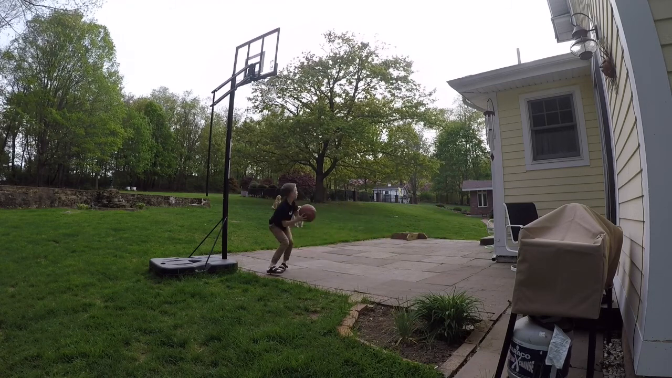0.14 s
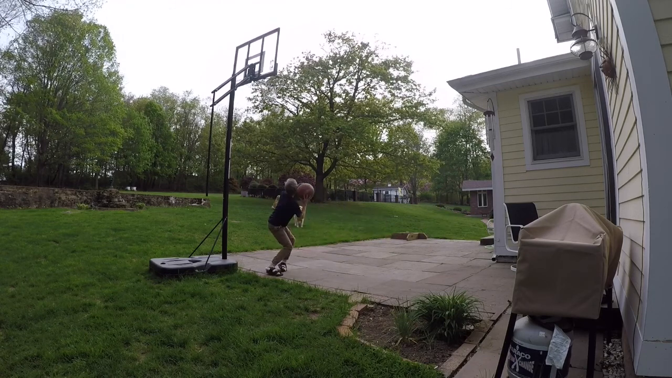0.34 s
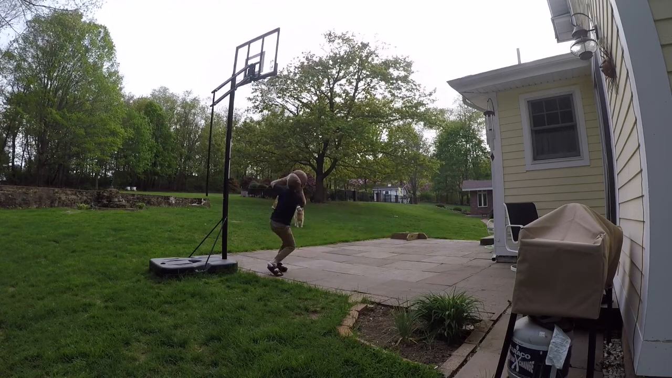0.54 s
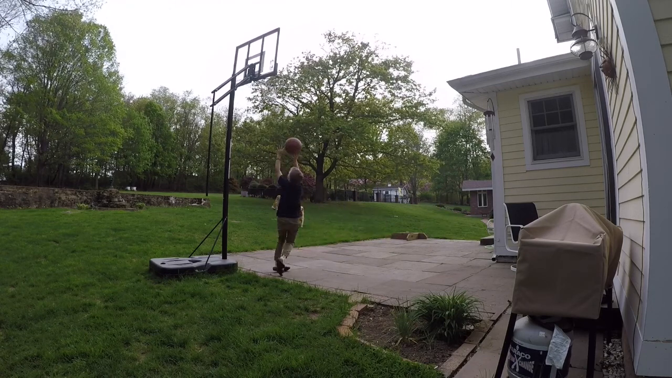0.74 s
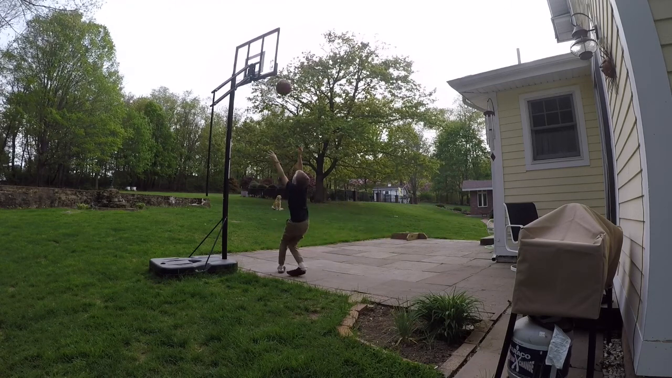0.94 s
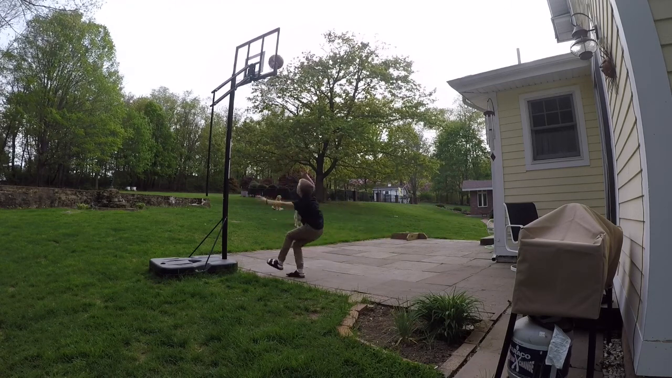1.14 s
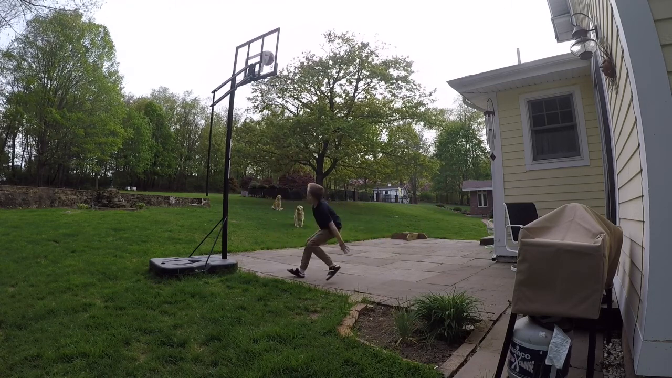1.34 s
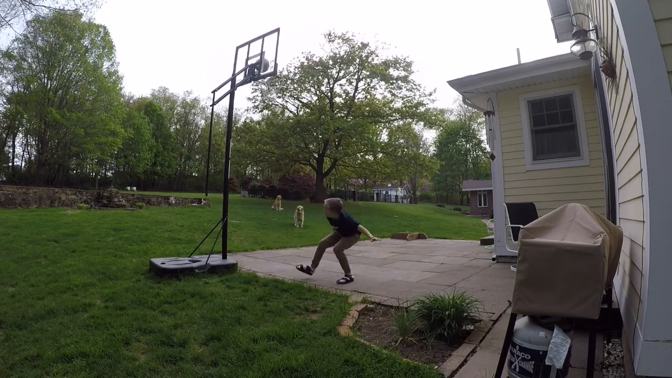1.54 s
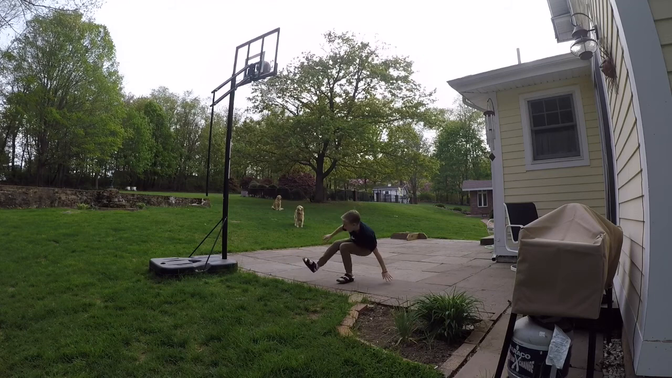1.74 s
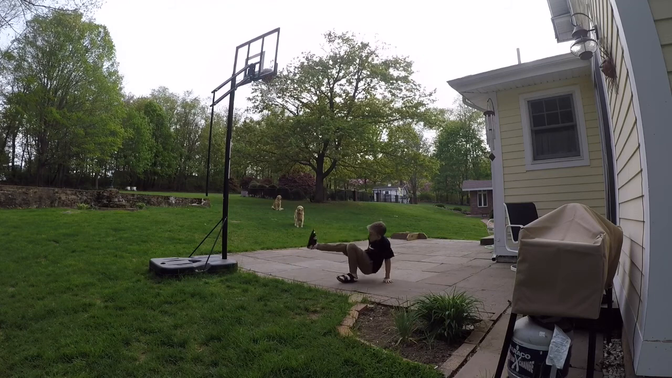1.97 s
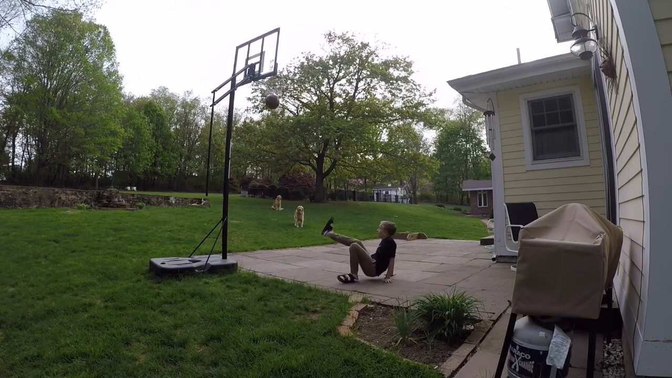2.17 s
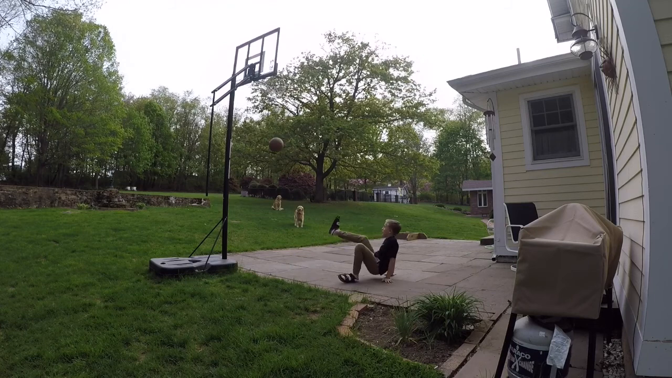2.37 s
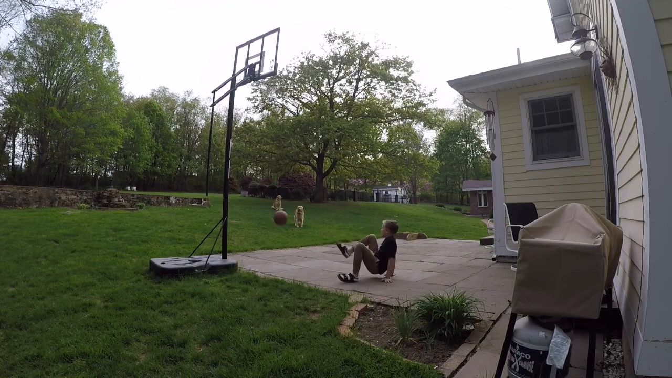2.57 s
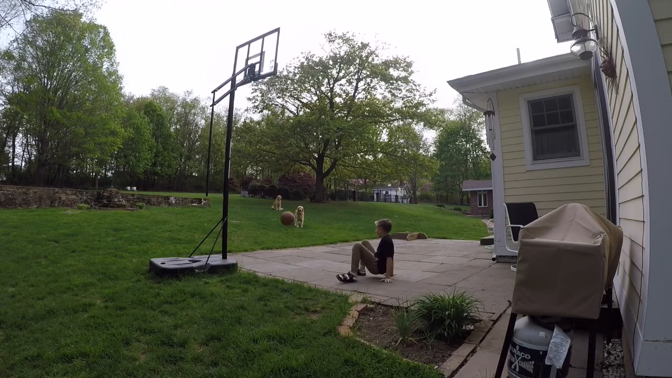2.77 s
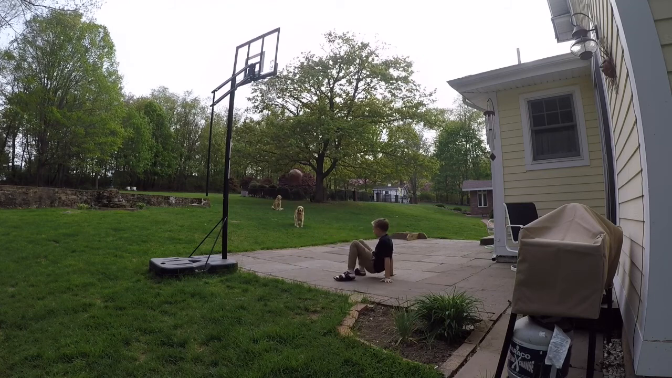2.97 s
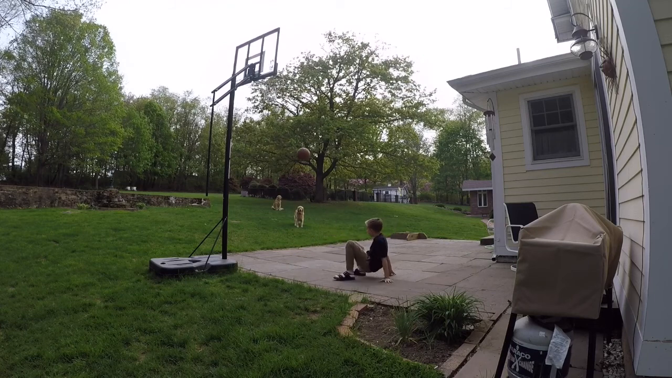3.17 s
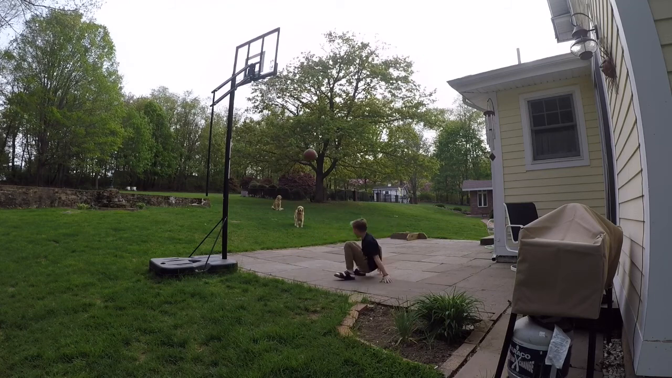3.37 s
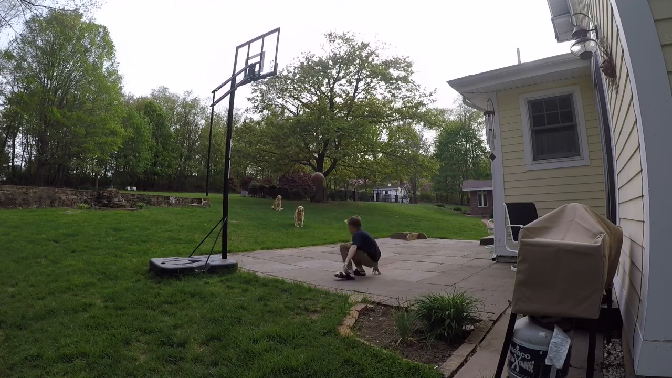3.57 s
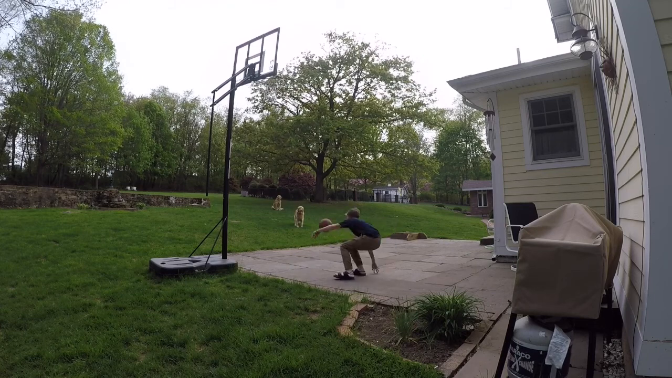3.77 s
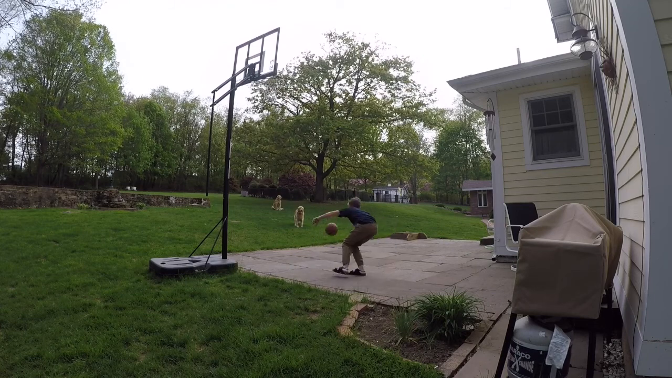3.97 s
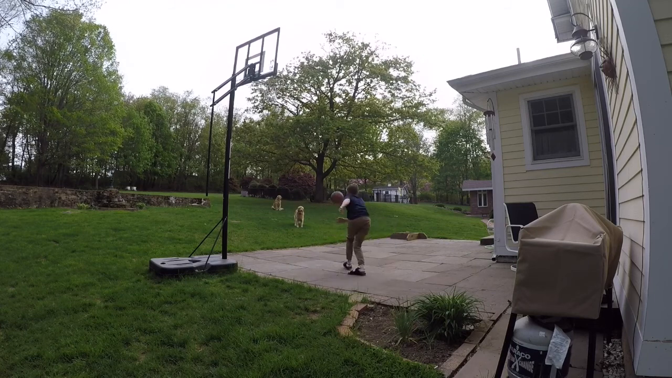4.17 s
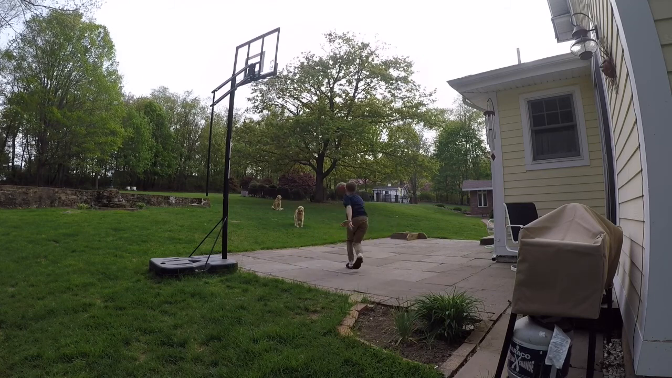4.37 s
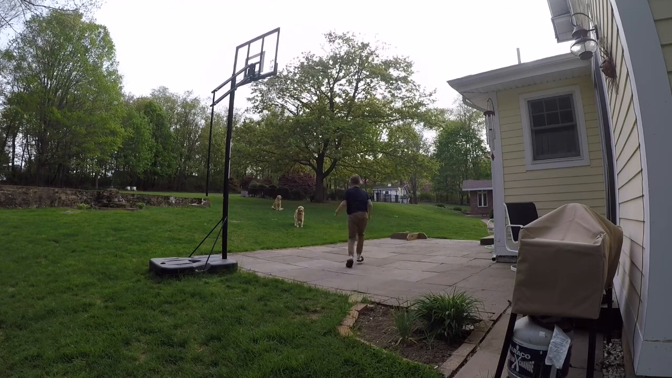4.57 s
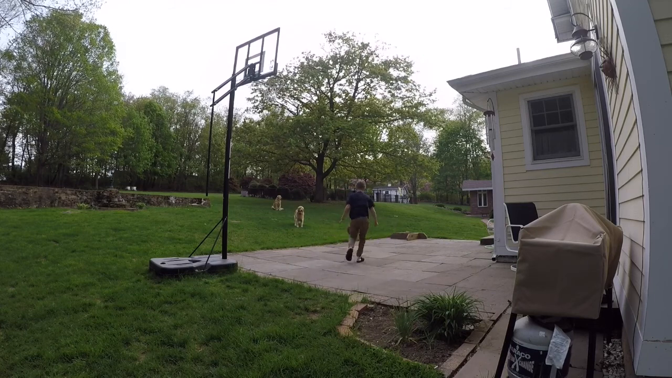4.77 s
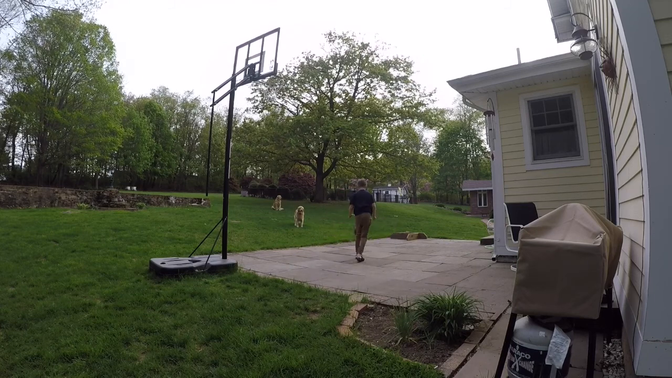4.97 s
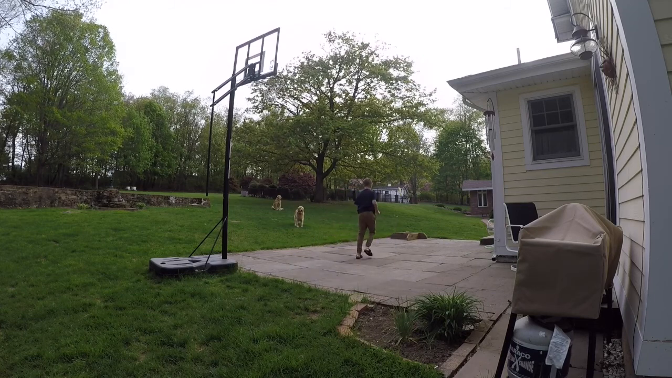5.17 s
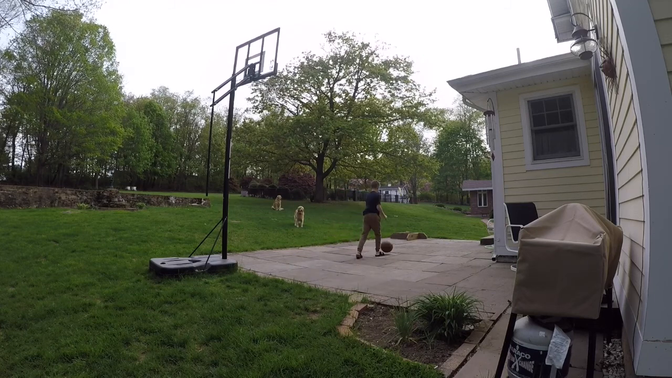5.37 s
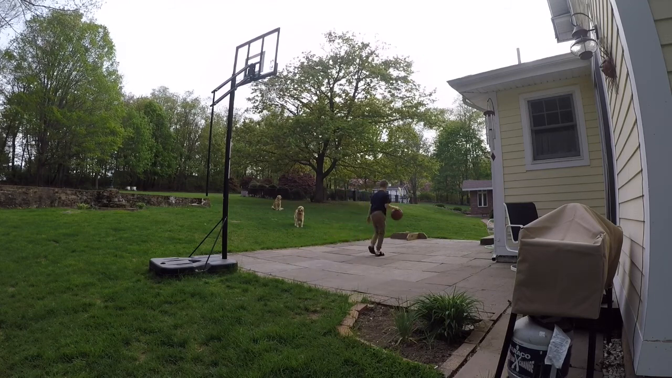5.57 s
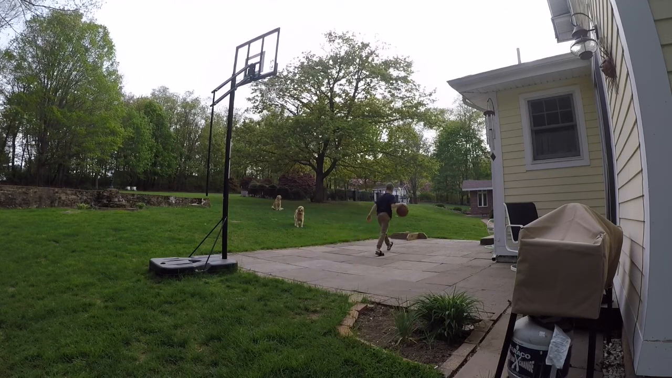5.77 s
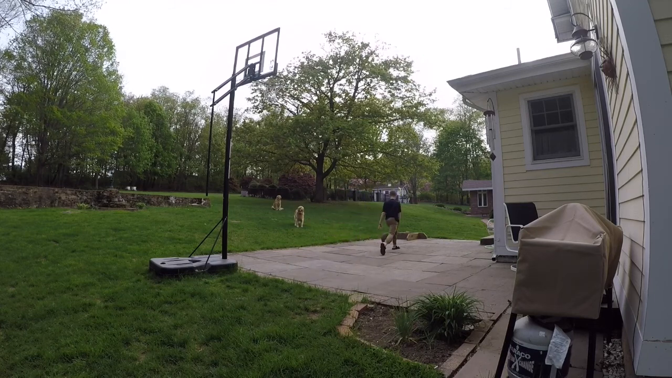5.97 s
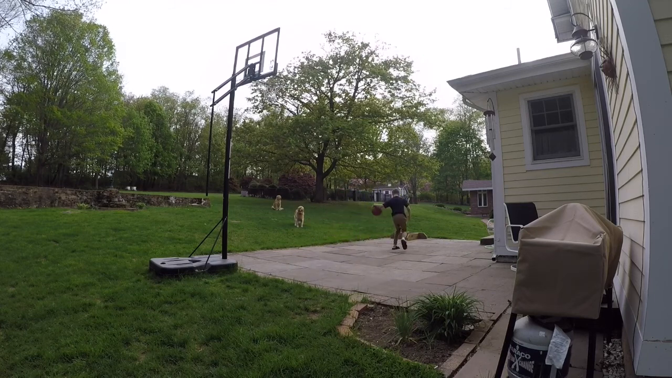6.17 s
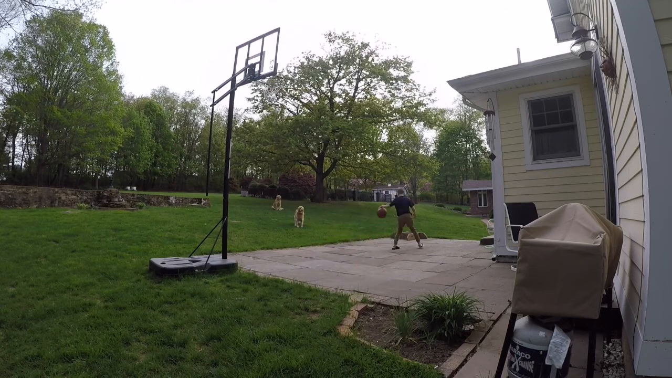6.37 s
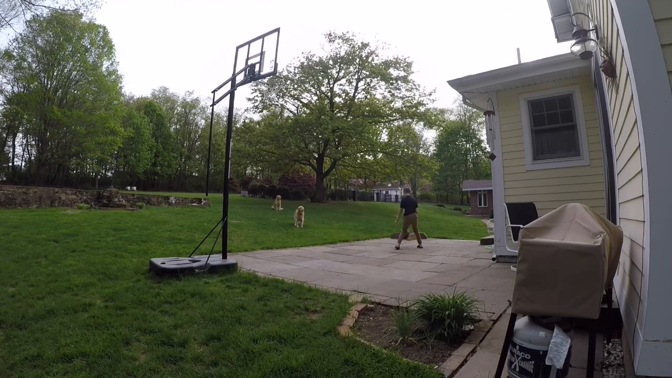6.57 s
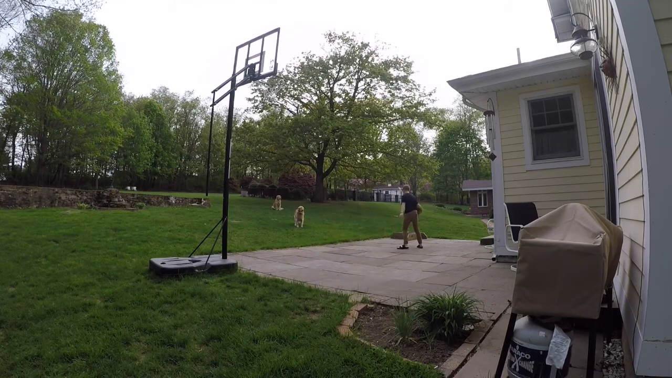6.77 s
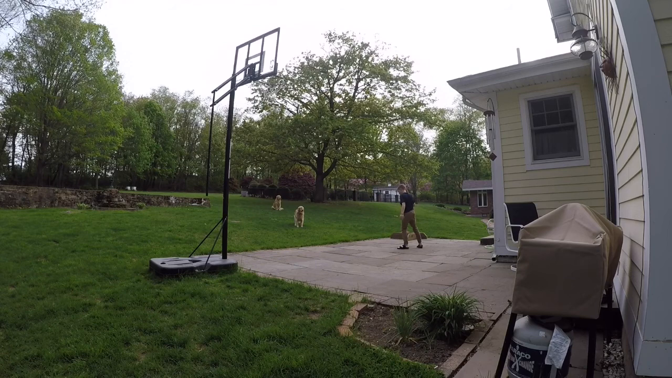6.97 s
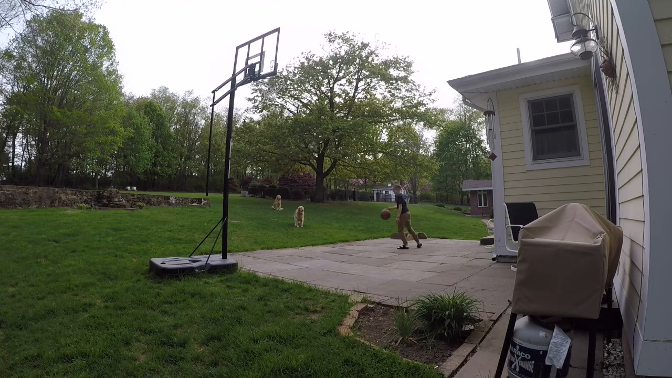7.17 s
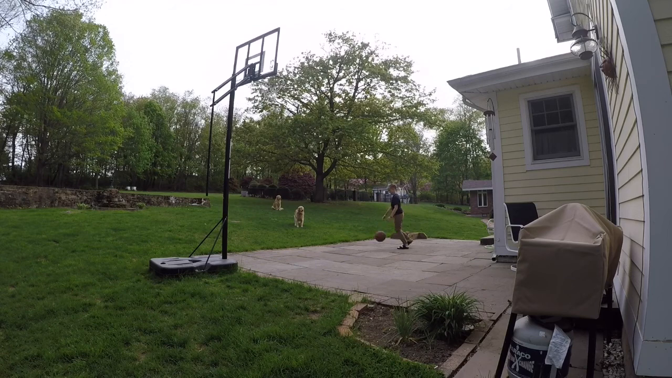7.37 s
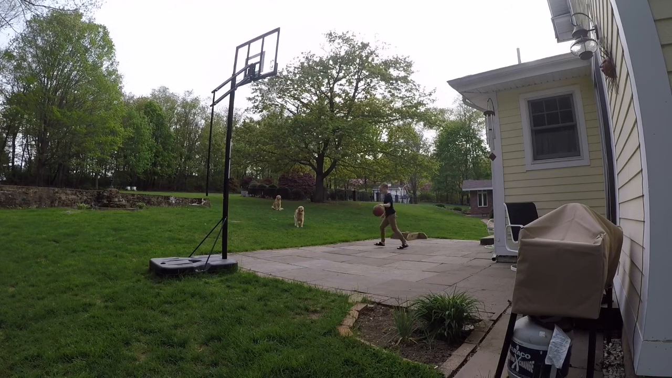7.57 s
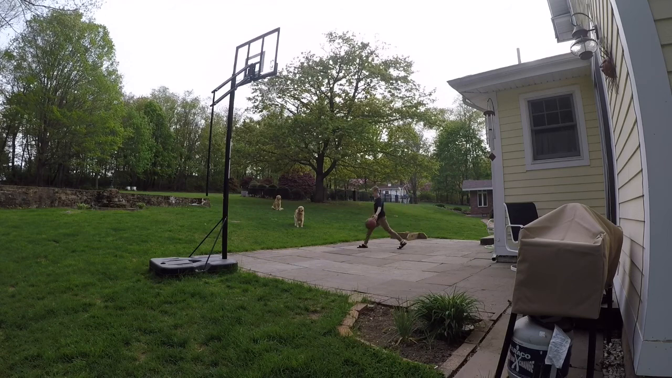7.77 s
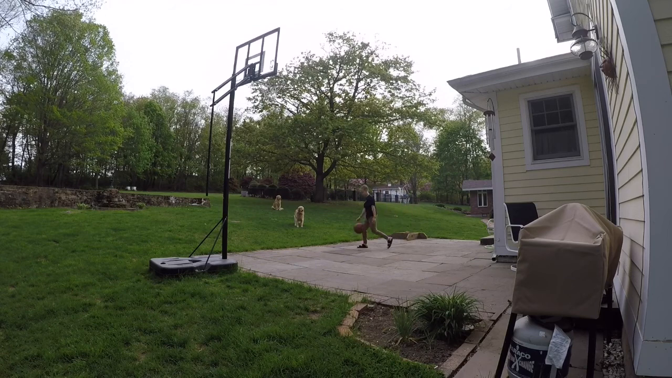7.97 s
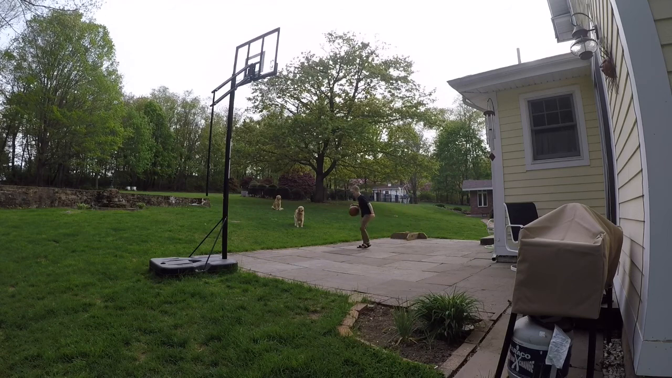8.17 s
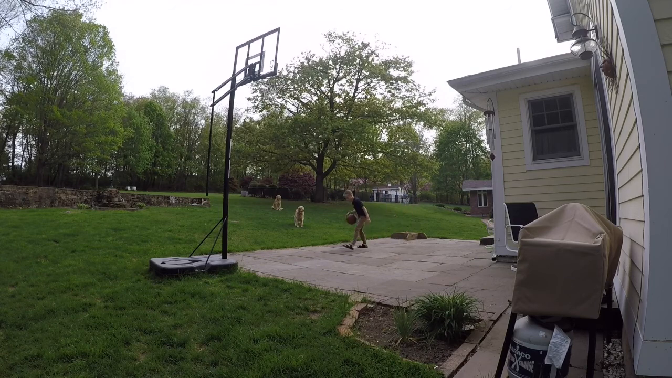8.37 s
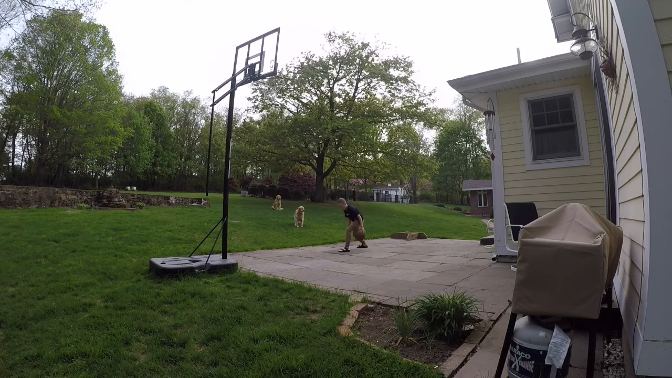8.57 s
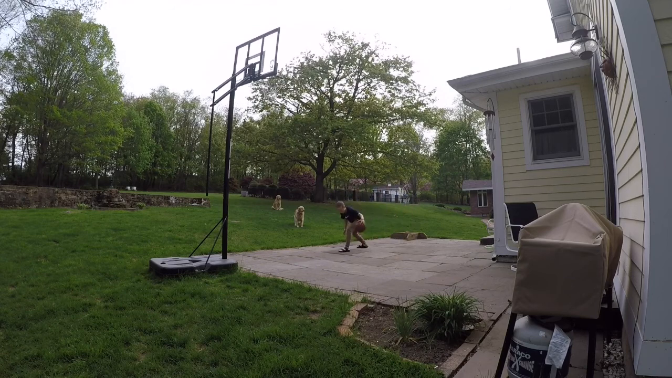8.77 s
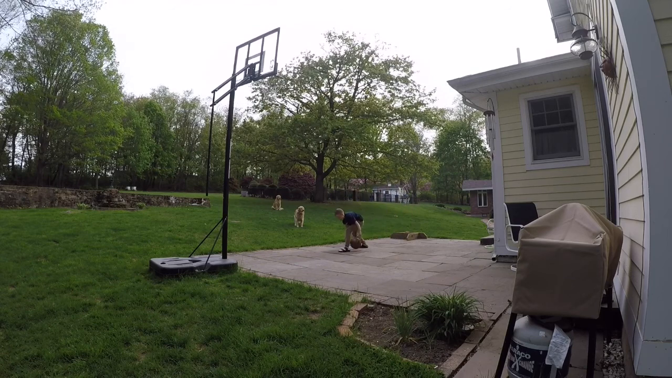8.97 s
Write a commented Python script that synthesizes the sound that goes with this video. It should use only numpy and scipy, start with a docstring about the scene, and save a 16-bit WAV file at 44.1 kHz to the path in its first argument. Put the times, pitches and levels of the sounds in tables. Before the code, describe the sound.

Shoes scuff, a metal hoop rattles, then a basketball is dribbled unevenly on stone over distant hum and a late breeze.

```python
"""Shoes slap and scuff on a stone patio while a distant engine drones over suburban hiss.
At 1.5 s a rubber ball jolts a loose metal hoop, which rattles, and a few short squeaks follow.
From 2.7 s the ball is dribbled between more slaps and scuffs; the house wall and far trees throw
the hits back. From about 7 s a breeze buffets the microphone."""
import sys
import numpy as np
from scipy import signal
from scipy.fft import rfft, irfft
from scipy.io import wavfile

SR = 44100
rng = np.random.default_rng(int(sys.argv[2]) if len(sys.argv) > 2 else 0)


def master_out(mix):
    """Clip the mix to full scale and print it as 16-bit PCM to the path in sys.argv[1]."""
    frames = np.transpose(np.atleast_2d(mix))
    ceiling = np.clip(frames, -1, 1)
    pcm = np.round(ceiling * 32767).astype(np.int16)
    wavfile.write(sys.argv[1], SR, pcm)


N = 397341
TIME = np.arange(N) / SR

# how hard the breeze hits the microphone: (time [s], level [dB])
BREEZE = [(0, -61), (.3, -72), (1.5, -72), (2.7, -76), (2.85, -54), (3.1, -66), (3.7, -69), (4.5, -72),
          (6.1, -76), (6.6, -53.5), (7.0, -52.5), (7.35, -41), (7.6, -39), (8.0, -34.5), (8.35, -41.5),
          (8.7, -34), (9.01, -45.5)]


def ball():
    """A rubber ball thuds on stone, the air inside it pings, and walls and trees send the hit back."""
    # (time [s], thud [dB], thud's tones above its pitch [dB], thud ring time [x], knock [dB], crack [dB], #
    # thud pitch [Hz], knock centre [Hz], knock narrowness [dB/octave^2], crack top [Hz], wall delay [s], # wall
    # echo [dB], far thud [dB], far crack [dB], scatter [dB], late scatter [dB])
    bounces = [(2.718, -5, -2.5, 0.78, -20, -4, 165.7, 1502, 12, 6800, 0.0075, -20, -12.5, -25, -13, -12.5),
               (3.9290, -8.5, -5, 0.82, -13, -7, 156, 1130, 28, 4930, 0.014, -18, -14.5, -30, -18, -16),
               (4.9110, -14, -1.5, 0.84, -14.5, -10, 155, 2160, 14, 4150, .021, -27, -15, -33, -21.5, -17.5),
               (5.4125, -16, 1.5, 0.82, -23, -6, 159, 1300, 12, 6700, 0.014, -13, -5, -22, -16, -16.5),
               (5.994, -11, -1.5, 0.91, -13, -9, 180, 1580, 10, 6800, .0095, -9, -13.5, -25, -18, -13.5),
               (6.5868, -12, -2.5, 0.48, -17.5, -14, 157, 1270, 14, 3800, 0.0063, -19, -5.5, -24, -21, -20),
               (7.3834, -13.5, -1.5, 0.91, -16, -10.5, 232, 1240, 10, 5600, 0.0096, -17, -15, -30, -18, -20.5),
               (7.9320, -15, 2, 1.16, -15, -11.5, 197, 1690, 18, 5430, 0.0086, -19, -16, -23, -20.5, -20),
               (8.5676, -13, 1, 1.37, -18, -10, 217, 1350, 15, 4600, 0.014, -16, -20, -26, -19, -21.5)]
    # low tones of squashed rubber: (pitch [x thud pitch], level [dB], base time to fade 60 dB [s])
    rubber_tones = [(1, 1.5, 0.054), (1.5, -0.5, 0.021), (2.7, -20.5, 0.091), (.62, -6.5, 0.13)]
    # air ringing inside the ball: (pitch [Hz], level [dB], time to fade 60 dB [s])
    air_tones = [(1030, -26, .14), (1580, -27, .15), (1900, -31, .2), (2510, -32, .2), (3150, -32, .2),
                 (4120, -34, .18), (5100, -37, .1)]
    thud_lag_s, far_echo_s = 0.0019, .0535
    far_thud_lead_s = .00382   # the far thud comes from a slightly nearer wall
    out = np.zeros((2, N))
    for (s, thud_db, other_db, ring, knock_db, crack_db, thud_hz, knock_hz, narrow_db, top_hz,
         wall_s, wall_db, far_thud_db, far_crack_db, scatter_db, late_db) in bounces:
        tones = [(ratio, db + other_db * (ratio > 1), ring * fade_s)
                 for ratio, db, fade_s in rubber_tones]
        thud = soft_thud(thud_db, thud_hz, tones, squash_s=0.00037)
        snap = shell_knock(knock_db, knock_hz, narrow_db, lean_db=-10.5)
        snap += contact_crack(crack_db, top_hz)
        ping = pan(amp(scatter_db) * struck(air_tones, vary_db=0.7), -2.5)
        add(out, s + thud_lag_s, thud)
        add(out, s, snap + ping)
        add(out, s, scatter(scatter_db, late_db))
        wall_echo = amp(-4) * thud + filtered(snap, 1, 3000)   # the near wall returns less thud and treble
        for trips in (1, 2):
            add(out, s + trips * wall_s, amp(trips * wall_db) * wall_echo)
        add(out, s + far_echo_s, amp(far_crack_db) * snap)
        add(out, s + far_echo_s - far_thud_lead_s, amp(far_thud_db) * thud)
    return out


def soft_thud(level_db, pitch_hz, tones, squash_s, stop_s=0.033):
    """A low swing builds as rubber is squashed and is choked as the contact ends."""
    swing = -struck([(pitch_hz * ratio, db, fade_s) for ratio, db, fade_s in tones], vary_db=0.86)
    t = np.arange(len(swing)) / SR
    build = 1 - np.exp(-(t / squash_s) ** 2)
    choke = np.exp(-(t / stop_s) ** 4)
    return pan(amp(level_db) * swing * build * choke, 3.6)


def shell_knock(level_db, centre_hz, narrow_db, lean_db):
    """Air squeezed out of the contact claps for a few cycles, and the struck shell rings."""
    # the shell's tones: (pitch [Hz], level [dB], time to fade 60 dB [s])
    shell_tones = [(800, -26.5, 0.0031), (1117, 6, 0.026), (1420, -5, 0.019), (1780, 2.5, 0.0045),
                   (2007, 2, 0.0061), (2110, -0.5, 0.0062)]
    t = np.arange(int(.3 * SR)) / SR
    # where the shell is struck decides which tones are strong
    tones = [(hz, db - narrow_db * np.log2(hz / centre_hz) ** 2, fade_s) for hz, db, fade_s in shell_tones]
    shell = amp(-10) * struck(tones, vary_db=1.8)
    clap = amp(-1.5) * np.sin(2 * np.pi * centre_hz * t) * np.exp(-(t / 0.0023) ** 4)
    left, right = pan(amp(level_db) * filtered(clap + shell, 2, 2800), lean_db)
    return np.array([np.roll(left, int(0.00055 * SR)), right])   # the left side is shaded and hears it late


def contact_crack(level_db, top_hz):
    """Rubber pimples meet the stone unevenly: a click, a tiny burst of noise and its ground echo."""
    t = np.arange(int(.3 * SR)) / SR
    burst = rng.standard_normal(len(t)) * amp(-27 - 60 * t / .012) + (t == 0)
    echo_s = .0006 * rng.uniform(0.63, 1.2)
    burst = burst + amp(-11) * np.roll(burst, int(echo_s * SR))
    crack = filtered(burst, 1, [0.33 * top_hz, top_hz], "band")
    crack = filtered(crack, 2, 0.81 * top_hz)
    bright_edge = amp(-49) * np.diff(burst, 2, prepend=[0, 0])
    return pan(amp(level_db) * (crack / np.abs(crack).max() + bright_edge), 0.61)


def hoop():
    """The ball jolts the hoop: loose joints chatter, the board and pole boom, the rim rings faintly."""
    # (time of full shake [s], rattle [dB], boom [dB], hold [s], time for the rattle to fall 20 dB [s])
    jolts = [(1.529, -38, -33, .015, .045), (1.578, -36, -28, .02, .04), (1.615, -35, -34, .018, .045),
             (1.68, -53, -43, .03, .06), (1.736, -47, -46, .004, .04), (1.826, -50, -38, .015, .03),
             (1.867, -37.5, -38.5, .016, .025), (2.0, -54, -51, .025, .03)]
    # tone colour of the loose joints: (frequency [Hz], level [dB])
    rattle_colour = [(710, -27), (1200, 7), (1460, -15), (1590, -17), (1740, -10), (1850, -1.5), (3770, 3),
                     (7400, -10.5), (10000, -41), (13000, -70), (22000, -120)]
    # resonances of board and pole: (pitch [Hz], width [Hz], level [dB])
    board_peaks = [(158, 31, 3), (253, 158, -2.5), (387, 10.6, 6), (692, 21, -6.5), (1026, 67, -7),
                   (1430, 56, -9), (1764, 57, -10.5)]
    # the rim's two tones: (pitch [Hz], time to fade 60 dB [s])
    rim_tones = [(3520, .35), (4260, .3)]
    # the rim set ringing: (time [s], lower tone [dB], upper tone [dB])
    rim_hits = [(1.53, -52, -66), (1.63, -50, -62), (1.72, -56, -72), (1.826, -70, -57), (1.88, -55, -70),
                (1.95, -61, -74), (2.77, -72, -56), (2.83, -74, -58), (2.9, -74, -60)]
    rise_s, boom_fall_s, yard_fall_s = 0.0042, 0.075, 0.23
    chatter = grains(2500 * amp(2.5 * drift(60)), spread_db=2.3)
    boom = resonant(rng.standard_normal((2, N)) + 1.24 * unit(chatter), board_peaks)
    shake = strokes([(s, db, rise_s, hold, fall) for s, db, _, hold, fall in jolts])
    sway = strokes([(s, db, rise_s, hold, boom_fall_s) for s, _, db, hold, _ in jolts])
    out = shake * pan(coloured(chatter, rattle_colour), 1.0) + sway * pan(boom, -0.23)
    yard_echo = strokes([(s + hold, db - 14.5, hold, .002, yard_fall_s) for s, db, _, hold, _ in jolts])
    out += yard_echo * coloured(rng.standard_normal((2, N)), rattle_colour)
    for s, *tones_db in rim_hits:
        # each tone is a close pair, which makes it throb
        pairs = [(hz + split_hz, db, fade_s)
                 for (hz, fade_s), db in zip(rim_tones, tones_db) for split_hz in (0, 23)]
        add(out, s, pan(struck(pairs, vary_db=2.0, length_s=.5), 1.5))
    return out


def slaps():
    """Sharp slaps with a pat, knock and crack: shoes landing, and a few hard echoes of the ball."""
    # (time [s], pat [dB], knock [dB], crack [dB], knock centre [Hz], knock narrowness [dB/octave^2])
    hits = [(0.21, -30.5, -30.5, -26.5, 800, 20), (1.4722, -24, -36, -20.5, 1500, 10),
            (2.151, -62, -36, -34, 1500, 18), (2.7497, -39, -19, -20, 1540, 23),
            (2.7568, -25, -23, -29, 1360, 21), (2.770, -38, -35, -24, 1500, 12),
            (4.281, -35, -36, -29, 1500, 8), (4.723, -28, -22, -38, 1130, 22),
            (5.0443, -47, -32, -28, 1390, 15), (5.4026, -29, -31, -33, 900, 12),
            (6.4864, -26, -10, -26, 1125, -5), (6.501, -50, -32, -32, 1400, 10),
            (6.6012, -55, -46, -36, 1800, 12), (7.8146, -25.5, -13, -36, 930, 5),
            (7.815, -50, -22, -44, 2050, 28), (7.8176, -40, -48, -18.5, 1810, 12),
            (7.822, -54, -45, -34, 1500, 12), (8.5294, -32, -23, -29, 1100, 16),
            (8.546, -50, -32, -31, 1700, 12)]
    # tones of the soft pat: (pitch [x pat pitch], level [dB], time to fade 60 dB [s])
    pat_tones = [(1, 10, 0.0091), (1.4, -19, 0.0029)]
    out = np.zeros((2, N))
    for s, pat_db, knock_db, crack_db, knock_hz, narrow_db in hits:
        pat = soft_thud(pat_db, pitch_hz=442, tones=pat_tones, squash_s=0.00079)
        knock = shell_knock(knock_db, knock_hz, narrow_db, lean_db=-11)
        add(out, s, pat + knock + contact_crack(crack_db, top_hz=5000))
        scatter_db = -13 + 0.56 * max(knock_db, crack_db)
        add(out, s, scatter(scatter_db, scatter_db, fade_speed=2.2, length_s=.35))
    return out


def scuffs():
    """Grains of grit are crushed in clumps under a sliding sole."""
    # (time of full level [s], level [dB], time to rise 20 dB [s], hold [s], time to fall 20 dB [s])
    slides = [(.66, -51, 0.24, 0.014, .01), (.685, -43, 0.022, 0.032, 0.022),
              (.756, -44.5, 0.02, 0.024, 0.018), (.79, -34.5, 0.035, 0.045, 0.011),
              (.844, -48, .005, .002, 0.17), (.968, -54.5, 0.014, .005, 0.11),
              (1.42, -44, 0.007, .002, 0.071), (2.81, -56.5, 0.0088, .002, .4),
              (2.944, -57, 0.025, 0.032, 0.1), (3.216, -59, 0.13, .002, 0.058),
              (3.766, -61, .012, .002, .11), (4.268, -53.5, .022, 0.011, .04),
              (4.696, -45.5, 0.012, 0.0021, 0.02), (5.04, -64, 0.17, 0.0087, .01),
              (5.383, -41, 0.003, .002, 0.031), (5.914, -53, .026, .002, .015),
              (6.47, -55, .026, 0.0023, .025), (7.344, -60, .022, 0.0021, 0.045),
              (7.784, -55, .016, .002, .012), (8.05, -50.5, 0.027, 0.0023, 0.048),
              (8.112, -57, 0.037, .002, .015), (8.532, -70, .017, .002, .1)]
    # tone colour of grit on stone: (frequency [Hz], level [dB])
    grit_colour = [(530, -32), (900, -10.5), (2310, -12), (2650, -10.5), (3010, -5.5), (4920, -0.5),
                   (5650, -0.5), (8160, -21), (11000, -31), (15000, -36)]
    grit = coloured(grains(5000 * amp(3 * drift(40)), spread_db=3.9), grit_colour)
    wide_hiss = coloured(rng.standard_normal((2, N)), grit_colour)
    return strokes(slides) * (pan(grit, 1.5) + 0.28 * wide_hiss)


def squeaks():
    """Rubber sticks and slips: short bursts of one unsteady pitch whose harmonics each flutter."""
    # (time [s], length [s], pitch [Hz], level [dB], overtone boost [dB])
    bursts = [(2.061, 0.0099, 1297, -46.5, 4), (2.074, 0.01, 1290, -42, -11),
              (2.091, 0.0088, 1310, -47, -14), (2.174, 0.015, 1290, -48, 7.5),
              (2.19, 0.017, 1280, -45.5, -4), (2.211, 0.0075, 1260, -44, -2)]
    # strength of each harmonic, lowest first: (level [dB])
    harmonics_db = [5, 0, -3, -15]
    out = np.zeros(N)
    wobble_s = np.cumsum(.03 * drift(120)) / SR
    flutters = [amp(5 * drift(250)) for _ in harmonics_db]
    for s, length, hz, db, over_db in bursts:
        progress = np.maximum(TIME - s, 0) / length
        shape = (1 - np.exp(-progress / 0.41)) * np.exp(-progress ** 2)
        for k, harmonic_db in enumerate(harmonics_db):
            tone = np.sin(2 * np.pi * (k + 1) * hz * (TIME + wobble_s))
            out += amp(db + harmonic_db + over_db * (k > 0)) * shape * flutters[k] * tone
    return pan(out, -1.5)


def scatter(level_db, late_db, fade_speed=0.97, length_s=0.79):
    """A hit returns as lumpy noise dying band by band, with a late swell from the tree line."""
    # echoes off house and trees: (low edge [Hz], high edge [Hz], level [dB], base time to fade 60 dB [s])
    near_bands = [(117, 333, -16.5, 0.29), (439.7, 980, -12, 0.09), (900, 2160, -10.5, 0.065),
                  (2520, 6100, -18.5, 0.08)]
    # echoes from farther off, with the same columns
    late_bands = [(900, 2080, -32, 0.98), (1930, 5080, -31, 0.8)]
    t = np.arange(int(length_s * SR)) / SR
    noise = rng.standard_normal((2, len(t))) + 1.08 * rng.standard_normal(len(t))
    tail = 0
    for bands, db in ((near_bands, level_db), (late_bands, late_db)):
        for low, high, band_db, fade_s in bands:
            band = unit(filtered(noise, 3, [low, high], "band"))
            tail = tail + amp(db + band_db - 60 * fade_speed * t / fade_s) * band
    lump_times = np.arange(0, length_s, .006)
    lumps_db = np.interp(t, lump_times, rng.normal(0, 2.0, len(lump_times)))
    trees_db = 3 * np.exp(-((t - 0.12) / 0.03) ** 2)
    return amp(lumps_db + trees_db) * tail * (1 - np.exp(-t / 0.0012))


def wind():
    """A breeze buffets the microphone with a lumpy low rumble and a few short gusts."""
    # (time [s], level above the breeze [dB])
    gusts = [(7.12, 6), (7.73, 2.5), (7.85, -2), (8.449, 4.5), (8.861, 8.5), (8.961, 13.5)]
    # tone colour of the buffeting: (frequency [Hz], level [dB])
    buffet_colour = [(12, -29), (20, 0.5), (53, 5), (73, 2), (140, -4), (171, -54), (200, -12.5),
                     (260, -63), (440, -120)]
    gusts_db = sum(db * np.exp(-((TIME - s) / .022) ** 2) for s, db in gusts)
    noise = rng.standard_normal(N) + 0.46 * rng.standard_normal((2, N))
    lumps_db = 2.5 * drift(23)
    return amp(curve(BREEZE)[0] + gusts_db + lumps_db) * coloured(noise, buffet_colour)


def engine():
    """A distant engine drones on one wavering note."""
    # (time [s], pitch [Hz], level [dB])
    drone = [(0, 222.7, -43.5), (.65, 221.8, -39), (1.0, 222.3, -42), (1.73, 223.2, -39), (2.65, 227, -41),
             (3.03, 223, -45), (4.12, 227.2, -51), (4.57, 230.2, -44), (5.3, 230.4, -44),
             (6.42, 228.3, -47), (6.75, 226.3, -54.5), (7.3, 228.5, -48), (8.0, 229, -49),
             (9.01, 225, -64.5)]
    hz, db = curve(drone)
    phase = 2 * np.pi * np.cumsum(hz + 1.635 * drift(10.3)) / SR
    return pan(amp(db + 1.1 * drift(4.1)) * np.sin(phase), 2.8)


def suburb():
    """Low rumble, a wash of far traffic and high hiss, each wavering gently in level."""
    # tone colours of the three layers: (frequency [Hz], level [dB])
    rumble_colour = [(56, -70), (95, -28.5), (151, 4), (193, -0.5), (221, 0), (254, -6.5), (330, -34),
                     (430, -52), (730, -120)]
    traffic_colour = [(180, -12), (300, 0.5), (338, -5), (463, -0.5), (505, -5), (569, -2), (1160, -4.5),
                      (1890, -14.5), (4000, -29.5), (5200, -38), (8800, -120)]
    hiss_colour = [(1470, -4), (2500, -4.5), (2990, -5), (3640, -4), (4690, -5.5), (6290, -4.5),
                   (8110, -6.5), (9780, -6), (12700, -16.5), (15000, -24)]
    rumble = amp(-48 + 1.2 * drift(5.8) + drift(0.56)) * far_noise(rumble_colour)
    traffic = amp(-46 + .5 * drift(3.8)) * far_noise(traffic_colour)
    hiss = amp(-58.5 + 0.62 * drift(4.2)) * far_noise(hiss_colour)
    return rumble + traffic + hiss


def far_noise(colour):
    """Noise from far away, which reaches the microphone's two sides partly alike."""
    # how alike left and right are: (frequency [Hz], likeness [-1 to 1])
    likeness = [(60, 0.74), (120, 0.85), (240, 0.35), (480, -0.15), (950, -0.36), (1890, -0.27),
                (3770, 0.59), (7520, -0.12), (15000, 0.026)]
    # which side is louder: (frequency [Hz], left minus right [dB])
    balance = [(60, -5), (120, -0.5), (240, 1.5), (480, 4), (950, -2.5), (1890, -1.5), (3770, -1),
               (7520, -2.5), (15000, -2.5)]
    hz = np.maximum(np.fft.rfftfreq(N, 1 / SR), 1)
    mid, side = rfft(rng.standard_normal((2, N)))
    alike = np.clip(at_hz(likeness, hz), -1, 1)
    lean = amp(at_hz(balance, hz) / 2)
    mid, side = np.sqrt(1 + alike) * mid, np.sqrt(1 - alike) * side
    return coloured(irfft([(mid + side) * lean, (mid - side) / lean], N), colour)


def amp(db):
    """Turns decibels into a gain."""
    return 10 ** (np.asarray(db) / 20)


def unit(x):
    """Scales a sound to an average power of 1."""
    return x / np.sqrt(np.mean(x ** 2) + 1e-20)


def pan(x, db):
    """Makes stereo, with the left side db louder than the right."""
    return x * amp([[db / 2], [-db / 2]])


def add(out, s, sound):
    """Mixes a short sound in at time s."""
    i = round(s * SR)
    out[:, i:i + sound.shape[1]] += sound[:, :N - i]


def filtered(x, order, hz, kind="low"):
    """Keeps what lies below hz, or inside a band; a higher order cuts more steeply."""
    return signal.sosfilt(signal.butter(order, hz, kind, fs=SR, output="sos"), x)


def curve(rows):
    """Joins a table's rows with straight lines in time, one curve per column."""
    s, *columns = np.transpose(rows)
    return [np.interp(TIME, s, column) for column in columns]


def strokes(rows):
    """A gain that rises, holds and falls for each row; rise and fall times span 20 dB."""
    out = np.zeros(N)
    for s, db, rise, hold, fall in rows:
        near = slice(max(int((s - .5) * SR), 0), int((s + 1) * SR))
        before = (s - TIME[near]) / max(rise, 1e-3)
        after = (TIME[near] - s - hold) / max(fall, 1e-3)
        out[near] += amp(db - 20 * np.maximum(np.maximum(before, after), 0))
    return out


def at_hz(points, hz):
    """Reads a (frequency, value) table between its rows."""
    table_hz, values = np.transpose(points)
    return np.interp(np.log(hz), np.log(table_hz), values)


def drift(rate_hz):
    """A smooth random wander of typical size 1."""
    memory = np.exp(-2 * np.pi * rate_hz * 40 / SR)   # one step every 40 samples
    noise = rng.standard_normal(N // 40 + 2002)
    slow = signal.lfilter([1], [1, -2 * memory, memory ** 2], noise)[2000:]
    return np.interp(np.arange(N) / 40, np.arange(len(slow)), unit(slow))


def coloured(source, colour):
    """Gives a sound the tone colour in a (frequency, level) table, at power 1."""
    hz = np.maximum(np.fft.rfftfreq(N, 1 / SR), 1)
    inside = (hz > colour[0][0]) & (hz < colour[-1][0])
    return unit(irfft(rfft(source) * amp(at_hz(colour, hz)) * inside, N))


def grains(per_s, spread_db):
    """Random clicks of uneven size."""
    sizes = amp(spread_db * np.minimum(rng.exponential(1, N), 4)) * rng.choice([-1, 1], N)
    return sizes * (rng.random(N) < per_s / SR)


def resonant(x, peaks):
    """Lets a sound ring through several resonances side by side, at power 1."""
    out = 0
    for k, (hz, width, db) in enumerate(peaks):
        r = np.exp(-np.pi * width / SR)
        gain = (1 - r * r) / 2
        feedback = [1, -2 * r * np.cos(2 * np.pi * hz / SR), r * r]
        out = out + (-1) ** k * amp(db) * signal.lfilter([gain, 0, -gain], feedback, x)
    return unit(out)


def struck(tones, vary_db, length_s=.3):
    """One blow: fading pure tones of alternating sign, their strengths new each time."""
    t = np.arange(int(length_s * SR)) / SR
    return sum((-1) ** k * amp(db + rng.normal(0, vary_db) - 60 * t / fade_s) * np.sin(2 * np.pi * hz * t)
               for k, (hz, db, fade_s) in enumerate(tones))


def bass_cut(x, cut_hz=141, open_db=-42):
    """Removes deep bass, but lets it back in as the breeze rises to open_db."""
    hz = np.fft.rfftfreq(N, 1 / SR)
    thin = irfft(rfft(x) / (1 + (cut_hz / np.maximum(hz, 1)) ** 16), N)
    opening = amp(1.6 * np.minimum(curve(BREEZE)[0] - open_db, 0))
    return thin + opening * (x - thin)


def scene():
    """Mixes everything in stereo; only the hits go through the bass cut."""
    hits = ball() + slaps() + hoop()
    return bass_cut(hits) + scuffs() + squeaks() + engine() + suburb() + wind()


def record(dry):
    """Cuts off the highest treble, reaching 70 dB down at 16500 Hz."""
    return signal.sosfilt(signal.cheby2(12, 70, 16500, fs=SR, output="sos"), dry)


dry = scene()
out = record(dry)
master_out(out)
```